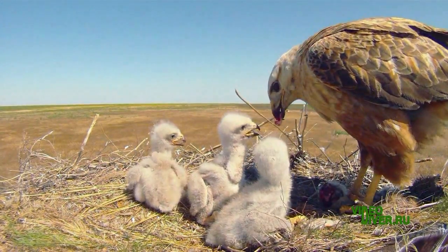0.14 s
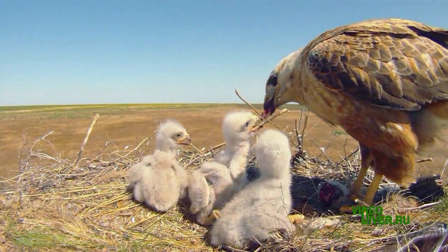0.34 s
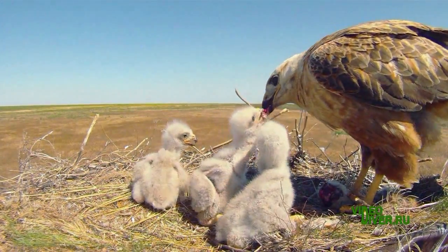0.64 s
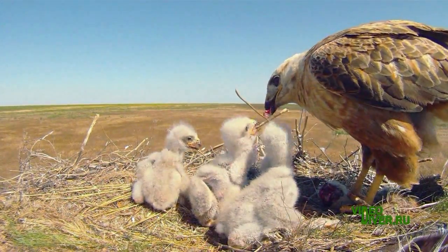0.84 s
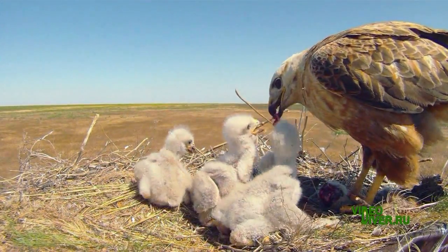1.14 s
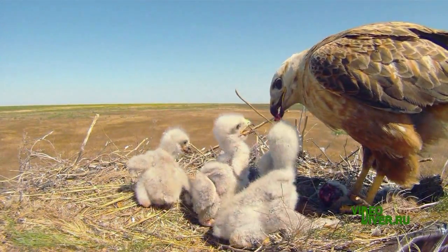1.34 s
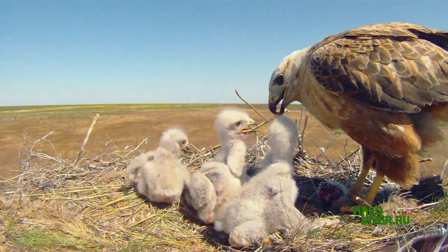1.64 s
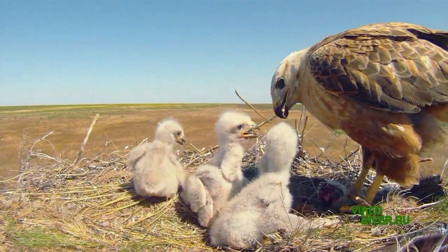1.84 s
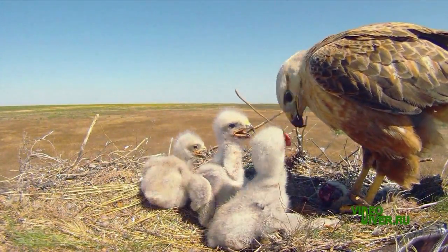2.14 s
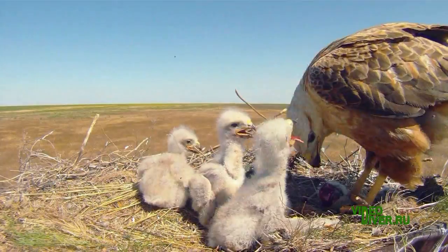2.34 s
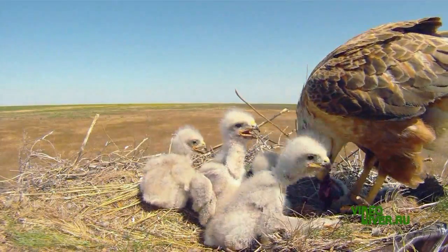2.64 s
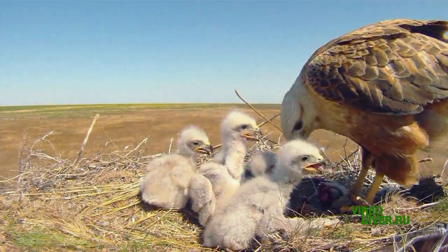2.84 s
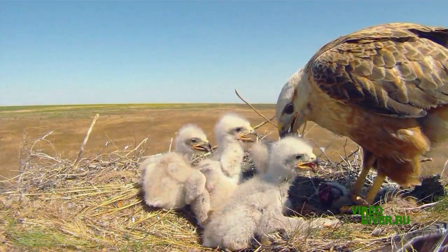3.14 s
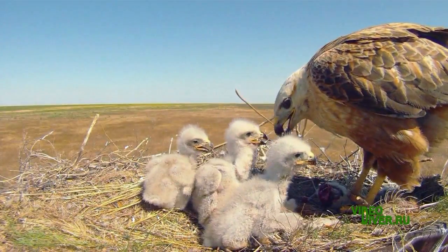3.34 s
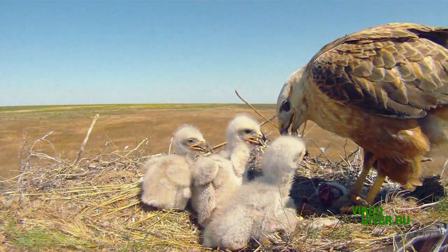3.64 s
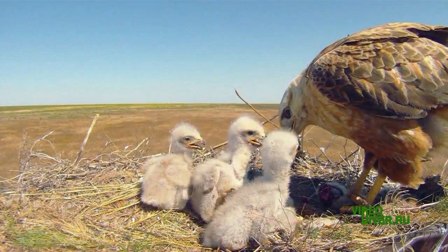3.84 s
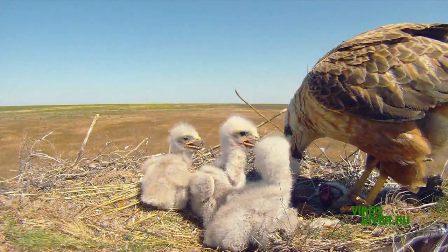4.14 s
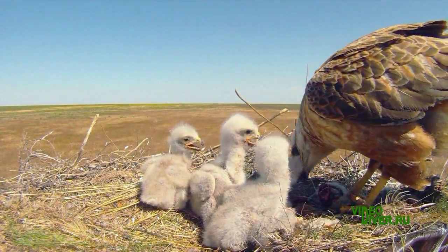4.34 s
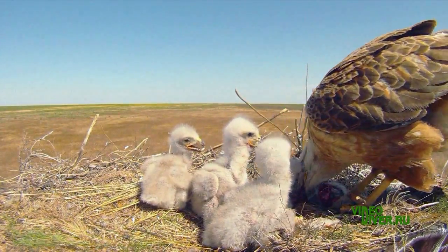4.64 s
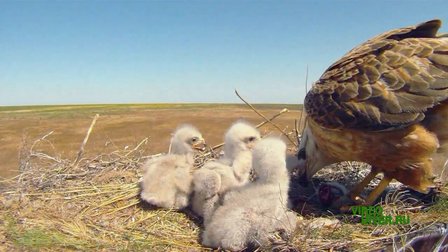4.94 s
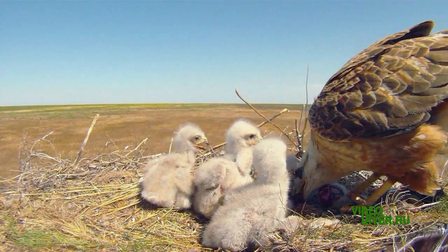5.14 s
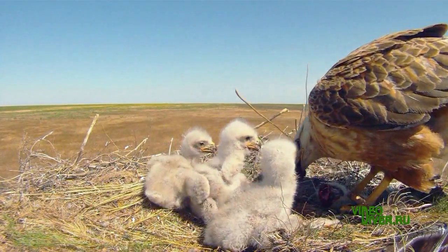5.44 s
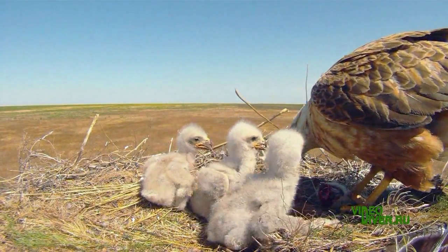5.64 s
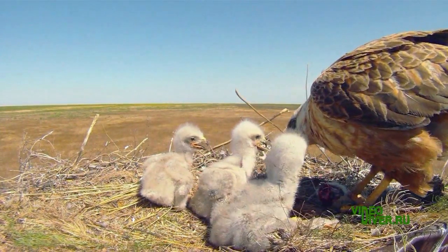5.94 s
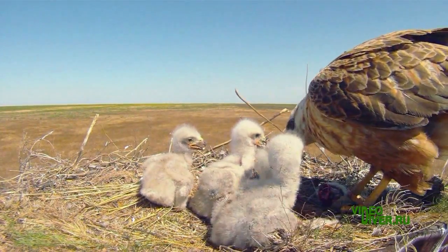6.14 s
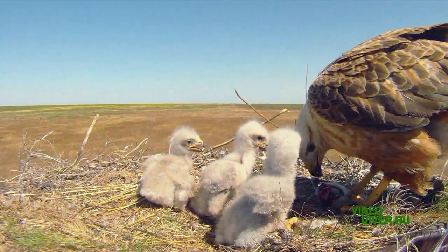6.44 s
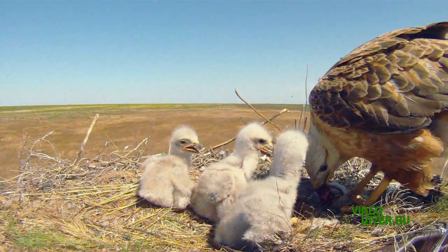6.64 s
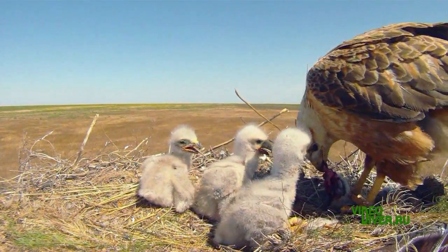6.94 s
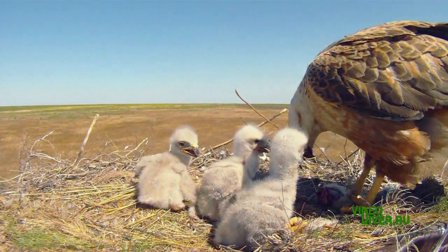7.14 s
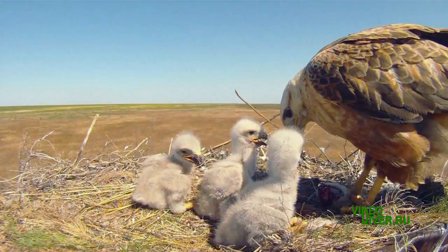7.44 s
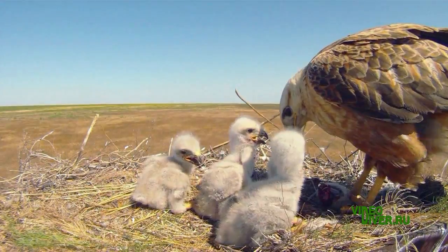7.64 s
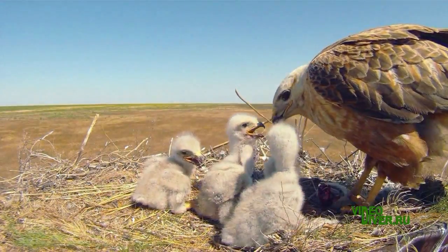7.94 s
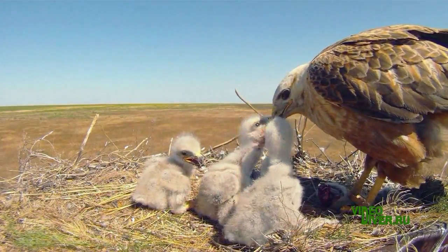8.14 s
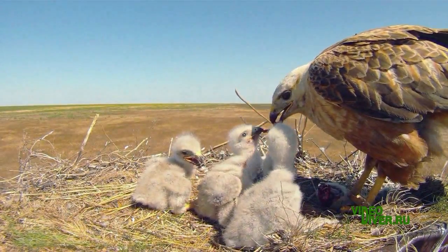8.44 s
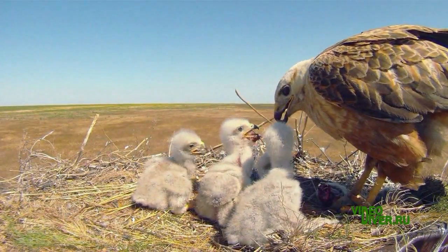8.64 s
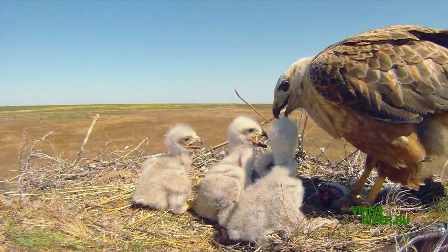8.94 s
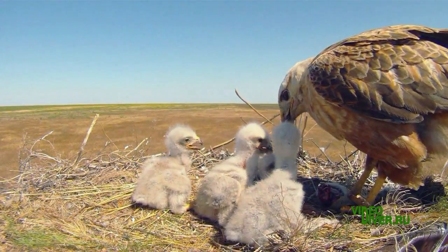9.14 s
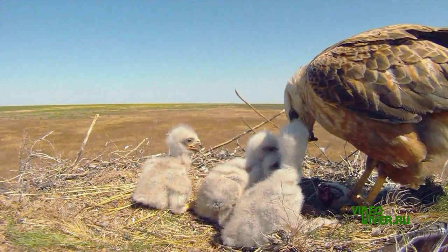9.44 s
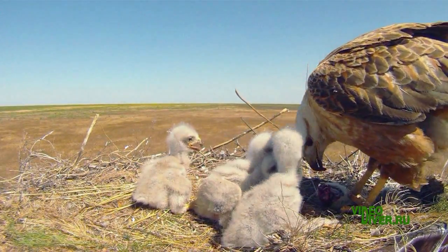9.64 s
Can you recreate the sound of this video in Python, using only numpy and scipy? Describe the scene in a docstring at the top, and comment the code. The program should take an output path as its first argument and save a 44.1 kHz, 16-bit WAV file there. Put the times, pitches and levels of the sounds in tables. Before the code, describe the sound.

Short high peeps and dry little rasps from nestlings at an open grassland nest, with far birdsong, wind buffeting and faint hiss.

```python
"""Raptor chicks beg at an open steppe nest, near a small mono camera. From the start, far songbirds warble over
wind rumble, preamp hiss and faint whines. From 0.3 s gliding syrinx tones make short pips and falling chips,
with throaty rasps of ringing glottal clicks, most just before a call. Long arched whistles rise at 5.6, 7.5 and
9.4 s; the wind thumps the microphone hardest near 6.4 s and the far chorus swells near 7.9 s."""
import sys
import numpy as np
from scipy import signal
from scipy.fft import rfft, irfft, next_fast_len
from scipy.io import wavfile
from scipy.ndimage import uniform_filter1d, map_coordinates

SR = 44100
rng = np.random.default_rng(int(sys.argv[2]) if len(sys.argv) > 2 else 0)


def store_wav(level_fs):
    """Save 16-bit WAV to argv[1]."""
    pcm = np.round(np.clip(np.atleast_2d(level_fs), -1, 1) * 32767)
    wavfile.write(sys.argv[1], SR, pcm.T.astype(np.int16))


N = 431738

# camera whines: (pitch [Hz], rms level [dB])
WHINE_TONES = [(9130, -87.5), (10880, -87), (11741, -91), (13297, -99)]
# preamp hiss spectrum: (frequency [Hz], relative density [dB])
HISS_SPECTRUM = [(35, -13), (60, 0), (360, -9.5), (473, -12.5), (1540, -21), (2270, -20.5), (2480, -20.5),
                 (3820, -19.5), (4380, -36), (5010, -27.5), (6890, -29), (11100, -31.5), (13600, -37.5)]
# wind spectrum at the microphone: (frequency [Hz], relative density [dB])
WIND_SPECTRUM = [(7.1, -18), (12, 2.5), (21, -1), (30, -6), (59, -15.5), (150, -33.5), (200, -57),
                 (330, -120)]
# wind buffeting: (time [s], level [dB])
WIND_LEVEL = [(0.0, -44), (4.14, -58.5), (6.19, -53.5), (6.38, -35.5), (7.14, -56), (8.37, -48),
              (9.79, -57)]
CAMERA_TOP_HZ = 13720

# far chorus spectrum: (frequency [Hz], relative density [dB])
CHORUS_SPECTRUM = [(880, -36), (1500, -20), (2790, -2.5), (3340, -2.5), (3990, 2), (4520, 2), (5300, -0.5),
                   (6260, -14), (7800, -31), (10100, -61), (17200, -120)]
# far birds together: (time [s], level [dB])
CHORUS_LEVEL = [(0.0, -56.5), (6.11, -56.5), (6.6, -60), (7.88, -54), (8.1, -57.5), (9.79, -59.5)]
# far notes that stand out: (start [s], length [s], start pitch [Hz], end pitch [Hz],
# mid-note rise over the straight glide [Hz], level [dB], roughness [0 clear, 1 rough])
FAR_NOTES = [(0.016, 0.033, 4550, 4220, 15, -53, 0.24), (0.059, 0.039, 3870, 3890, -60, -53, 0.2),
             (0.224, 0.1, 3530, 3330, 120, -60, .1), (0.441, 0.1, 4370, 4010, -140, -55.5, 0.93),
             (.79, .11, 2340, 2610, 249, -62, 0), (.96, .04, 3140, 2760, 180, -61, .03),
             (1.073, 0.06, 3950, 4040, -200, -54, 0.8), (1.245, .12, 3450, 4670, 1250, -57, 0.75),
             (1.449, 0.07, 2990, 3460, 170, -56.5, 0.1), (1.504, 0.094, 3910, 4320, 1000, -57, .7),
             (1.578, 0.04, 4440, 5080, -750, -51.5, 0.08), (1.699, .077, 2900, 3150, -40, -58, 0.06),
             (1.768, 0.09, 4500, 5210, 700, -55.5, .7), (1.803, .065, 5100, 5050, 11, -55, 0),
             (1.95, .03, 4300, 3940, -200, -58, .03), (2.024, .11, 4850, 3570, 846, -56, 1.07),
             (2.31, 0.042, 2510, 1800, 252, -59, .03), (2.323, 0.067, 4750, 3530, -100, -56, 0.3),
             (2.441, .092, 2860, 2640, 423, -58, 0.1), (2.72, .17, 4270, 3550, 100, -60, 0.01),
             (2.918, .11, 4240, 4030, 299, -59, 0.93), (3.125, .04, 2500, 4200, 300, -56, 0.2),
             (3.408, 0.14, 4350, 4580, 250, -58, 1.04), (3.552, 0.11, 3570, 3240, 54, -58, 0),
             (3.698, 0.11, 4390, 4170, 18, -57, 0.24), (3.867, 0.077, 4470, 5060, -35, -58.5, .1),
             (3.98, 0.11, 4260, 4630, 178, -56, 0.1), (4.08, 0.073, 4370, 3880, -78, -57, .03),
             (4.434, .08, 4920, 4180, -600, -60, 0), (4.72, .06, 5190, 5150, 13, -64, .03),
             (4.81, .08, 2450, 2400, 15, -69, 0), (4.833, .09, 3970, 3590, 100, -60, .1),
             (5.03, .045, 4510, 4750, 30, -54, 0.1), (5.125, .04, 4300, 2900, -50, -64, 0.1),
             (5.25, .05, 4900, 4600, -50, -59, 0.26), (5.9, 0.14, 5270, 4620, -61, -57, 0.09),
             (6.029, 0.054, 4460, 3900, 52, -52.5, .1), (6.21, 0.14, 5230, 5180, 17, -63, .2),
             (6.63, .045, 2460, 2330, -15, -64.5, 0), (6.656, 0.047, 4240, 4480, 230, -59, 0.06),
             (6.949, .12, 4120, 3860, 16, -54.5, 0.84), (7.192, .11, 4600, 5010, 319, -53.5, .97),
             (7.21, 0.044, 3260, 1780, 247, -56.5, 0), (7.429, .027, 3780, 4190, -250, -50.5, 0.85),
             (7.448, 0.084, 5220, 4730, 322, -54, 0.9), (7.508, .047, 4130, 3430, 450, -52, .1),
             (7.621, 0.19, 3460, 2560, -100, -61, 0.11), (7.73, .055, 5020, 4960, 80, -48.5, 0.15),
             (7.952, 0.075, 5190, 4780, 277, -51.5, .4), (8.242, 0.11, 4720, 3590, 51, -53, 1.07),
             (8.552, .085, 4730, 3220, 348, -58, .15), (8.86, 0.04, 3990, 3810, 300, -58, 0.93),
             (8.957, 0.034, 2290, 1940, 348, -59, .03), (9.54, .046, 3060, 2570, -28, -58, .03),
             (9.581, .13, 4350, 4310, 70, -57.5, 0.93)]
# throb rate and pitch shake of a clear and a rough note
CLEAR_TRILL_HZ, ROUGH_TRILL_HZ, CLEAR_SHAKE_HZ, ROUGH_SHAKE_HZ = 55.6, 84.4, 35, 333

# throat rasps: (start [s], chick, length [s], level [dB], beak ring over throat ring [dB])
RASP_EVENTS = [(0.343, "B", 0.012, -40.5, -6), (0.738, "A", 0.068, -52, -12),
               (1.603, "A", 0.015, -36.5, -6.5), (1.851, "A", 0.046, -45, -4), (2.256, "A", .011, -40, -12),
               (2.708, "A", 0.069, -48, 2), (3.165, "A", .028, -41.5, -1), (3.238, "C", 0.0077, -42, -8),
               (3.545, "A", .061, -44, -9), (3.632, "B", 0.02, -35.5, -1), (4.164, "A", .05, -41.5, -1),
               (4.594, "A", 0.05, -47, 6), (4.632, "B", 0.029, -36, 3), (4.955, "A", 0.046, -41, 1),
               (5.198, "B", 0.024, -39, 2), (5.355, "A", 0.034, -39, -1.5), (5.73, "A", .048, -42, 2.5),
               (6.145, "A", 0.032, -41.5, 1), (6.767, "A", 0.044, -41.5, -.5), (7.048, "A", 0.028, -48, 3),
               (8.011, "B", .02, -38, 0), (8.078, "A", .018, -47.5, -6), (8.34, "B", 0.019, -39.5, 2),
               (8.76, "B", 0.028, -39.5, 3), (9.048, "B", .016, -43, 5)]
# each chick: (chip's first pitch [ratio to top], top reached [share of lead-in], top left [share of lead-in],
# pitch on leaving [ratio to top], level change on leaving [dB], loudest pitch [Hz], knee time [share of fall],
# knee depth [share of pitch drop], knee level before tail gain [dB], last level before tail gain [dB],
# base throat pitch of the rasp [Hz])
CHICK_TRAITS = {"A": (1.06, 0.26, 0.7, 0.9444, 3.5, 3946, 0.35, .46, -24, -32.5, 956),
                "B": (1.04, 0.4, 0.47, 1.02, -1.5, 3040, 0.67, .92, -7.5, -19, 1376),
                "C": (0.85, 0.42, 0.67, 1.04, -1, 3778, 0.6, .97, -4, -13.5, 1036),
                "D": (0.96, 0.27, 0.71, 0.92, 3, 3680, 0.62, .88, -5.5, -15, 1040)}
# throat colour: (frequency [Hz], relative gain [dB])
THROAT_GAIN = [(1500, 3.5), (2500, -1.5), (3300, -2), (4000, 13), (5000, -2), (6000, -2.5), (7000, -4),
               (8500, -13), (10000, -24), (14000, -60)]
# syrinx overtones: (multiple of the pitch, level before the throat and call settings [dB])
SYRINX_OVERTONES = [(2, -10), (3, -14.5)]
# membranes slap shut on low pitches: (pitch [Hz], overtone gain [dB])
SLAP_GAIN = [(2600, -0.5), (3600, -11.5)]
# stretched membranes leak air on high pitches: (pitch [Hz], breath gain [dB])
BREATH_GAIN = [(4300, -11.5), (5200, 7)]
# spans in which the calls break up: (start [s], end [s])
HOARSE_SPANS = [(5.62, 5.632), (5.672, 5.72), (5.79, 5.815), (5.868, 5.902), (7.52, 7.57), (7.61, 7.68),
                (9.4, 9.43), (9.475, 9.55)]
# falling chips: (loudest time [s], chick, level [dB], lead-in [s], top pitch [Hz], lead-in over level [dB],
# fall [s], last pitch [Hz], tail gain [dB])
CHIP_EVENTS = [(.3493, "B", -35, 0.0081, 3350, -6, 0.01, 1650, 2.5),
               (1.1, "C", -34, 0.026, 5230, -16.5, .013, 2310, 0.9),
               (1.6058, "A", -36, .006, 4470, -22, 0.013, 2500, 10),
               (1.7337, "D", -34, .027, 4350, -3.5, .022, 1816, -2.5),
               (1.8923, "B", -36.5, 0.0087, 3500, -2, 0.0094, 1560, 8.5),
               (2.0115, "C", -32.5, .033, 5170, -4.5, 0.012, 1990, -1.5),
               (2.257, "A", -42.5, .007, 4300, -8, 0.011, 2660, 18),
               (2.752, "A", -38, 0.0029, 4470, -4, 0.01, 2530, 15),
               (2.5975, "C", -25, .037, 6150, -17, 0.013, 2200, 0.8),
               (3.172, "A", -29.5, 0.0069, 4210, -17, .014, 2300, 2),
               (3.2362, "C", -22.5, 0.032, 5210, -16, .013, 2260, 0),
               (3.5875, "A", -30, 0.0064, 4720, -13, 0.01, 2460, 12),
               (3.6468, "B", -30, 0.013, 3270, -11, 0.0088, 1580, -3.5),
               (4.2096, "A", -18, .029, 6860, -50, .026, 1760, -2.5),
               (4.655, "A", -17, .031, 5940, -34, .017, 1670, 7),
               (4.6998, "D", -30, 0.028, 5150, -13.5, 0.016, 2020, 2),
               (4.996, "A", -18, 0.034, 6000, -40.5, 0.022, 1700, -2),
               (5.22, "B", -30.5, .0165, 4900, -6, 0.0094, 1600, .4),
               (5.3888, "A", -17.5, 0.029, 5670, -37, 0.019, 1700, -1.3),
               (5.779, "A", -20.5, 0.037, 5840, -27.5, 0.024, 1710, 0.5),
               (6.1767, "A", -19, .024, 5580, -35, 0.015, 2400, 3),
               (6.8011, "A", -31, .012, 4750, -13.5, .02, 1740, 14.5),
               (8.0253, "B", -29.5, 0.011, 4010, -11, .0095, 1720, -3.5),
               (8.3597, "B", -29.5, .015, 4650, -9.5, 0.0087, 1720, -6),
               (8.7893, "B", -28.5, 0.026, 5250, -13, 0.0076, 1570, -4),
               (9.0657, "B", -31, 0.02, 4860, -10, 0.0072, 1620, 1.5)]
# short pips: (loudest time [s], pitch [Hz], level [dB], glide [Hz/s], release [s])
PIP_EVENTS = [(0.3376, 4420, -29, -170000, .005), (1.3404, 1760, -34.5, -75000, 0.0036),
              (1.8148, 3740, -40, 100000, .011), (1.8817, 4100, -30, -60000, 0.0054),
              (2.555, 4800, -34.5, -180000, 0.0061), (3.632, 4250, -25, -220000, 0.0037),
              (4.1693, 3920, -39, 5000, 0.0036), (4.602, 3990, -28.5, 30000, 0.0094),
              (4.6373, 4420, -26, -30000, 0.0087), (4.671, 2220, -42, -57000, 0.0094),
              (4.72, 2520, -45, -42000, 0.0072), (4.949, 3850, -27.5, -10000, 0.004),
              (5.1974, 4270, -29, -170000, 0.0033), (5.3443, 3650, -35, 5000, 0.008),
              (5.7248, 3880, -27, 5000, 0.0043), (6.141, 3950, -30, 5000, .004),
              (6.7758, 3870, -41, 20000, .008), (8.0078, 4840, -37, -200000, 0.007),
              (8.284, 4030, -35, -5000, .002), (8.3376, 5000, -34, -170000, 0.0097),
              (8.7603, 5180, -35.5, -200000, 0.0056), (8.9725, 3690, -43, 65000, 0.027),
              (9.038, 4730, -33, -100000, 0.01)]
PIP_ATTACK_S, PIP_START_DB, PIP_END_DB = .005, -24, -14.5  # dB over the pip's level
# one track per whistle: (time [s], pitch [Hz], level [dB])
WHISTLE_TRACKS = [
    [(5.566, 3130, -56), (5.592, 4070, -38.5), (5.62, 4440, -43.5), (5.67, 5700, -40), (5.725, 5880, -45),
     (5.745, 5300, -50), (5.77, 5520, -46), (5.826, 6150, -44.5), (5.938, 6450, -48), (5.992, 6300, -55),
     (6.04, 4380, -55)],
    [(7.488, 3810, -52), (7.508, 4060, -46), (7.52, 4910, -44), (7.575, 5370, -38), (7.602, 5800, -38.5),
     (7.638, 5870, -43.5), (7.708, 6180, -44), (7.806, 6780, -43.5), (7.89, 6220, -49), (7.935, 3900, -56)],
    [(9.36, 3170, -51), (9.386, 3870, -39.5), (9.406, 4540, -43.5), (9.444, 5420, -39),
     (9.496, 5660, -40.5), (9.552, 6190, -42.5), (9.63, 6470, -47), (9.704, 6840, -49),
     (9.744, 6980, -51.5), (9.788, 6760, -48)],
]


def amp(db):
    """Gain of a level in dB."""
    return 10 ** (np.asarray(db) / 20)


def unit(x):
    """x at rms 1."""
    return x / np.sqrt(np.mean(x ** 2) + 1e-20)


def along(points, hz):
    """(Hz, value) points interpolated on a log axis."""
    point_hz, values = np.transpose(points)
    return np.interp(np.log(hz + 1), np.log(point_hz + 1), values)


def curve(rows):
    """One value per sample from (s, value) rows."""
    return np.interp(np.arange(N) / SR, *np.transpose(rows))


def wobble(rate_hz, size=N):
    """Smooth random curve with rate_hz knots a second."""
    knots = rng.standard_normal(int(size * rate_hz / SR) + 4)
    return map_coordinates(knots, [np.arange(size) * rate_hz / SR])


def filtered(x, response):
    """x through a complex response of frequency in Hz."""
    size = next_fast_len(N + SR // 2)
    return irfft(rfft(x, size) * response(np.fft.rfftfreq(size, 1 / SR)), size)[:N]


def noise(spectrum):
    """Coloured noise at rms 1."""
    return unit(filtered(rng.standard_normal(N), lambda hz: amp(along(spectrum, hz))))


def add(out, start_s, sound):
    """Mixes sound into out from start_s on."""
    part = out[round(start_s * SR):][:len(sound)]
    part += sound[:len(part)]


def scattered(x, t60_s):
    """x smeared by a dying tail of random echoes."""
    t = np.arange(SR // 4) / SR
    tail = rng.standard_normal(len(t)) * amp(-60 * t / t60_s)
    return signal.fftconvolve(x, tail / np.linalg.norm(tail))[:N]


def whine(hz, db):
    """A thin electronic sine, its pitch drifting by a few Hz."""
    drifting_hz = hz + 3 * wobble(4.5)
    return np.sqrt(2) * amp(db) * np.sin(2 * np.pi * np.cumsum(drifting_hz) / SR)


def camera():
    """Coloured preamp hiss plus steady whines."""
    return amp(-56.5) * noise(HISS_SPECTRUM) + sum(whine(*row) for row in WHINE_TONES)


def wind():
    """Low noise in random lumps: air buffeting the microphone port."""
    lumps = amp(1.95 * wobble(8))
    return amp(curve(WIND_LEVEL)) * unit(noise(WIND_SPECTRUM) * lumps)


def note(length_s, start_hz, middle_hz, end_hz, trill_hz, shake_hz):
    """A far whistle slurred through three pitches, throbbing at trill_hz, its pitch shaken at random."""
    u = np.linspace(0, 1, round(length_s * SR))
    # parabola through the three pitches
    hz = start_hz * (1 - u) * (1 - 2 * u) + 4 * middle_hz * u * (1 - u) + end_hz * u * (2 * u - 1)
    hz += shake_hz * wobble(350, size=len(u))
    throb = 1 - 0.32 * np.cos(2 * np.pi * trill_hz * length_s * u)
    envelope = np.sin(np.pi * u) ** 0.1
    return np.sqrt(2) * np.sin(2 * np.pi * np.cumsum(hz) / SR) * throb * envelope


def clear_notes():
    """Distinct far notes; rough ones throb faster and shake more in pitch."""
    out = np.zeros(N)
    for start_s, length_s, start_hz, end_hz, arch_hz, db, rough in FAR_NOTES:
        trill_hz = CLEAR_TRILL_HZ + rough * (ROUGH_TRILL_HZ - CLEAR_TRILL_HZ)
        shake_hz = CLEAR_SHAKE_HZ + rough * (ROUGH_SHAKE_HZ - CLEAR_SHAKE_HZ)
        middle_hz = (start_hz + end_hz) / 2 + arch_hz
        add(out, start_s, amp(db) * note(length_s, start_hz, middle_hz, end_hz, trill_hz, shake_hz))
    return out


def far_chorus():
    """Many random notes, blurred by distance into a flickering noise haze."""
    crowd = np.zeros(N)
    draws = rng.standard_normal((1300, 6))
    starts_s = rng.random(len(draws)) * N / SR
    for start_s, (pitch, rise, fall, stretch, loudness, shake) in zip(starts_s, draws):
        hz = np.clip(3900 * np.exp(.26 * pitch), 2300, 6200)
        start_hz = hz * np.exp(0.1213 * rise - .1)
        end_hz = hz * np.exp(0.121 * fall - .12)
        length_s = .028 * np.exp(.4 * stretch)
        sung = note(length_s, start_hz, hz, end_hz, trill_hz=61.4, shake_hz=90 * np.exp(0.702 * shake))
        add(crowd, start_s, amp(2.5 * loudness + .4 * along(CHORUS_SPECTRUM, hz)) * sung)
    blurred = unit(crowd) + amp(5.0) * unit(scattered(crowd, t60_s=0.061))
    haze = noise(CHORUS_SPECTRUM) * amp(2.9 * wobble(11))
    return amp(curve(CHORUS_LEVEL)) * unit(unit(blurred) + amp(-4.0) * haze)


def songbirds():
    """Distinct notes and their echoes stand out of the far chorus."""
    clear = clear_notes()
    return clear + amp(-2.5) * scattered(clear, t60_s=0.14) + far_chorus()


def rasp(chick, length_s, db, beak_db):
    """Uneven glottal clicks ring the throat low and the beak cavity high."""
    throat_hz = CHICK_TRAITS[chick][-1]
    gap, strength, detune = rng.standard_normal((3, 40, 1))
    click_s = np.cumsum(.003 * np.exp(.45 * gap), axis=0) - .003
    t = np.arange(round((length_s + .012) * SR)) / SR  # 12 ms for the last ring
    age_s = np.maximum(t - click_s, 0)
    size = amp(2.5 * strength) * (click_s < length_s)
    opening = 0.874 + 0.34 * click_s / length_s  # the throat's pitch climbs as the beak opens
    low_hz = throat_hz * opening * np.exp(.18 * detune)
    high_hz = 3900 * np.exp(0.11 * detune)
    low = np.sin(2 * np.pi * low_hz * age_s) * amp(-60 * age_s / 0.015)
    high = np.sin(2 * np.pi * high_hz * age_s) * amp(beak_db - 60 * age_s / 0.023)
    # crackling breath past the folds
    crackle = amp(4.2 * wobble(450, size=len(t))) * (t < length_s)
    air = amp(beak_db - 8.0) * rng.standard_normal(len(t)) * crackle
    return amp(db) * (np.sum(size * (low + high), axis=0) + air)


def small_throat(hz):
    """Band response: a small throat passes neither deep bass nor the top treble."""
    highpass = (1j * hz / 550 / (1 + 1j * hz / 550)) ** 2
    return highpass / (1 + 1j * hz / 9000) ** 6


def rasps():
    """All rasps through the small throat."""
    out = np.zeros(N)
    for start_s, *settings in RASP_EVENTS:
        add(out, start_s, rasp(*settings))
    return filtered(out, small_throat)


def voice(track, overtone_db, breath_db, shimmer_db, fade_s):
    """A syrinx tone on its pitch track; the throat colours the overtones, breath noise rides on the pitch."""
    s, hz, db = np.transpose(track)
    t = np.arange(s[0], s[-1], 1 / SR)
    hz, db = (uniform_filter1d(np.interp(t, s, v), size=70, mode="nearest") for v in (hz, db))
    hoarse = sum((t > start) & (t < end) for start, end in HOARSE_SPANS)
    # an unsteady membrane throws the pitch about
    waver_hz = 30 * wobble(60, size=len(t))
    flutter_hz = (15 + 105 * hoarse) * wobble(350, size=len(t))
    phase = 2 * np.pi * (np.cumsum(hz + waver_hz + flutter_hz) / SR + rng.random())
    breath = amp(breath_db + along(BREATH_GAIN, hz) + 13.0 * hoarse) * wobble(1900, size=len(t))
    shimmer = amp(shimmer_db * wobble(170.5, size=len(t)) - 2.0 * hoarse)
    tone = np.sin(phase) * (shimmer + breath)
    for k, level_db in SYRINX_OVERTONES:
        throat_db = along(THROAT_GAIN, k * hz) - along(THROAT_GAIN, hz)
        lift_db = throat_db + along(SLAP_GAIN, hz)
        tone += amp(level_db + overtone_db + lift_db) * np.sin(k * phase)
    edges = np.clip(np.minimum(t - s[0], s[-1] - t) / fade_s, 0, 1)
    return np.sqrt(2) * amp(db) * edges * tone


def whistles():
    """Long arched syrinx tones, almost pure outside the hoarse spans."""
    out = np.zeros(N)
    for track in WHISTLE_TRACKS:
        add(out, track[0][0], voice(track, overtone_db=-3, breath_db=-32.5, shimmer_db=0.5, fade_s=0.0018))
    return out


def pip(peak_s, hz, db, glide_hz_per_s, release_s):
    """Track of a quick swell and release on a straight glide."""
    return [(peak_s - PIP_ATTACK_S, hz - glide_hz_per_s * PIP_ATTACK_S, db + PIP_START_DB),
            (peak_s, hz, db),
            (peak_s + release_s, hz + glide_hz_per_s * release_s, db + PIP_END_DB)]


def chip(peak_s, chick, db, lead_s, top_hz, lead_db, fall_s, last_hz, tail_db):
    """Track: a faint lead-in rounds its top, swells on dropping through the loudest pitch and dies below."""
    first, reach, leave, sag, dip_db, loud_hz, knee, depth, knee_db, last_db, _ = CHICK_TRAITS[chick]
    start_s = peak_s - lead_s
    return [(start_s, first * top_hz, db + lead_db),
            (start_s + reach * lead_s, top_hz, db + lead_db),
            (start_s + leave * lead_s, sag * top_hz, db + lead_db + dip_db),
            (peak_s, loud_hz, db),
            (peak_s + knee * fall_s, loud_hz + depth * (last_hz - loud_hz), db + knee_db + tail_db),
            (peak_s + fall_s, last_hz, db + last_db + tail_db)]


def chips_and_pips():
    """Short syrinx tones, bright with overtones and breath."""
    out = np.zeros(N)
    for track in [chip(*row) for row in CHIP_EVENTS] + [pip(*row) for row in PIP_EVENTS]:
        add(out, track[0][0], voice(track, overtone_db=2.0, breath_db=-11.5, shimmer_db=0.5, fade_s=0.00052))
    return out


def scene():
    """The straw of the nest gives the chicks a short blur; one microphone feeds both channels."""
    chicks = rasps() + whistles() + chips_and_pips()
    straw = amp(-18) * scattered(chicks, t60_s=.04)
    mono = camera() + wind() + songbirds() + straw + chicks
    return np.array([mono, mono])


def record(dry):
    """The camera keeps nothing above its band limit."""
    return np.array([filtered(x, lambda hz: hz < CAMERA_TOP_HZ) for x in dry])


dry = scene()
out = record(dry)
store_wav(out)
```